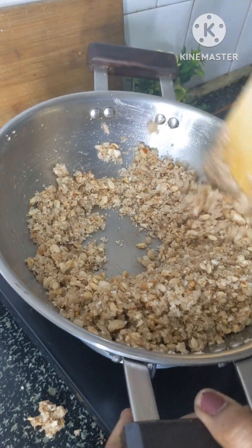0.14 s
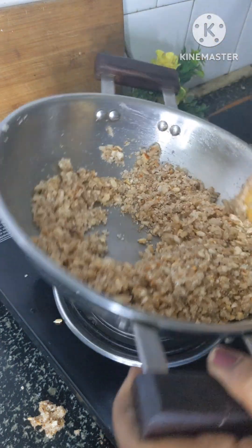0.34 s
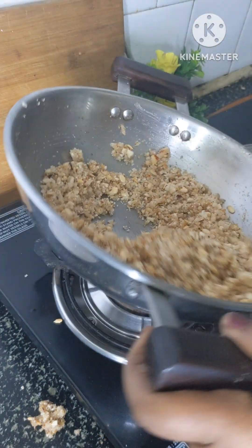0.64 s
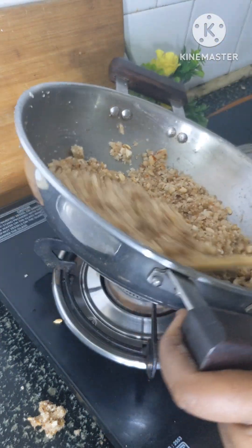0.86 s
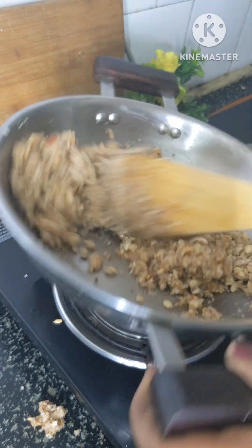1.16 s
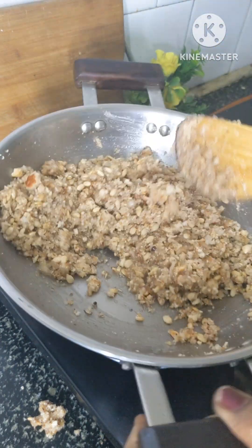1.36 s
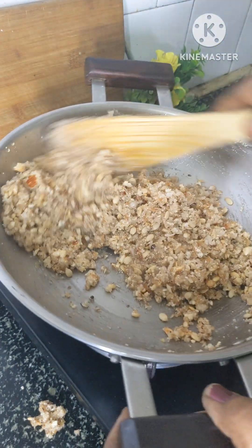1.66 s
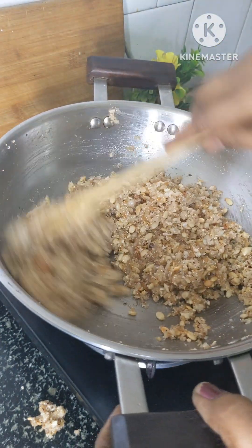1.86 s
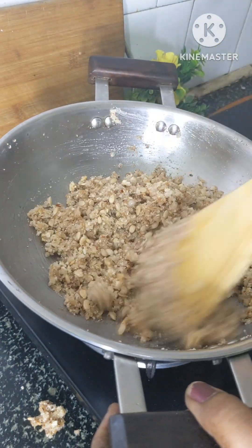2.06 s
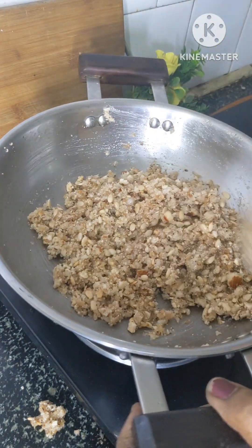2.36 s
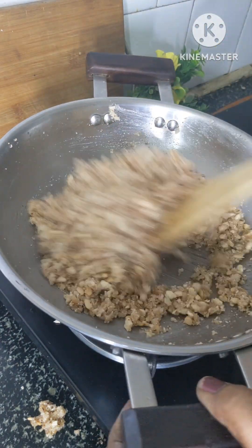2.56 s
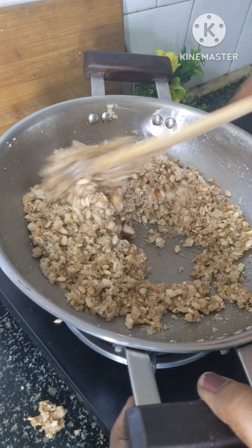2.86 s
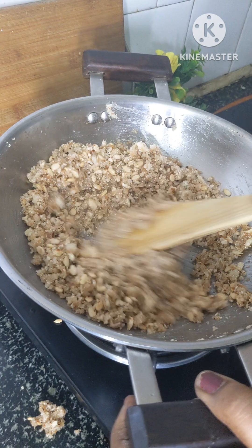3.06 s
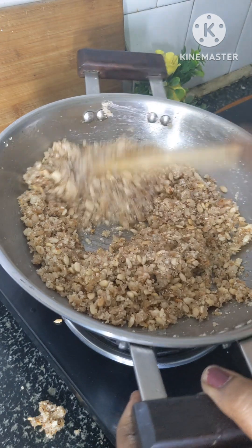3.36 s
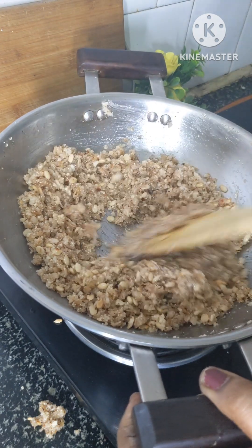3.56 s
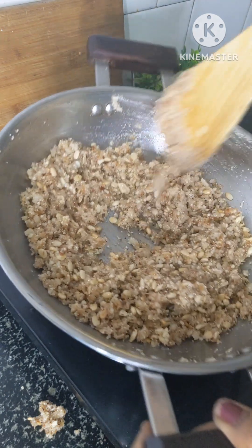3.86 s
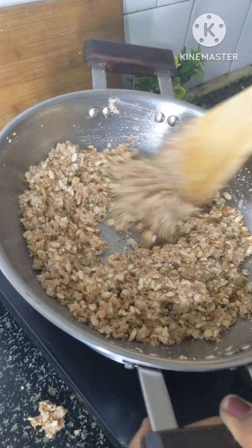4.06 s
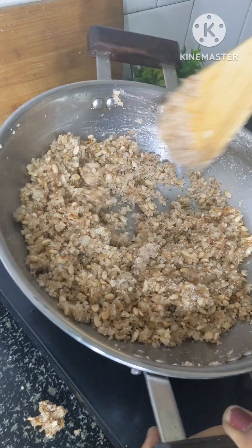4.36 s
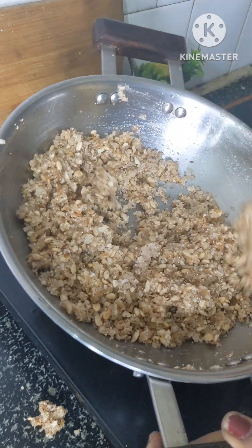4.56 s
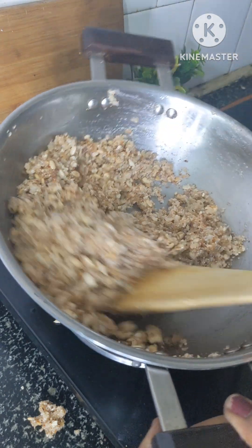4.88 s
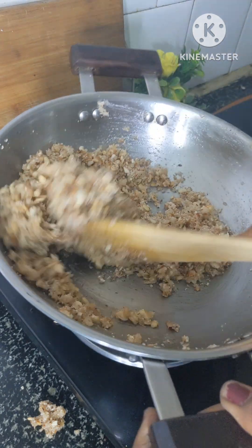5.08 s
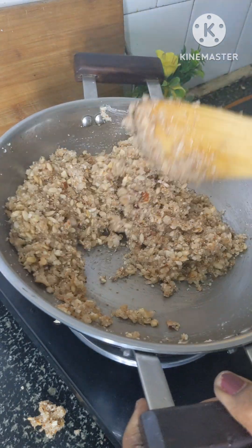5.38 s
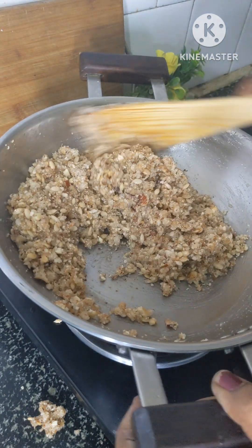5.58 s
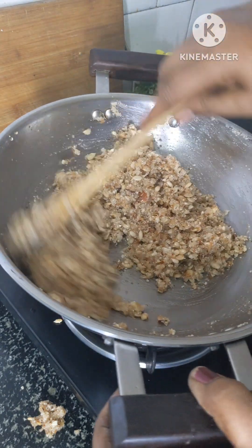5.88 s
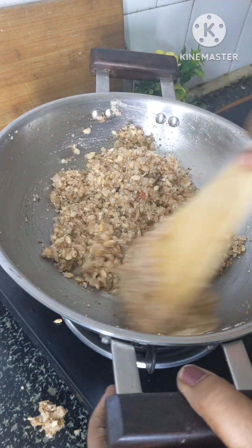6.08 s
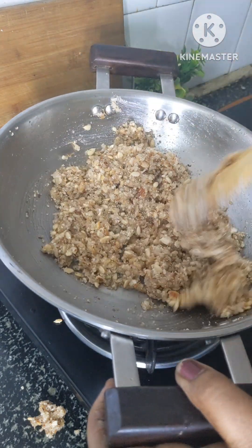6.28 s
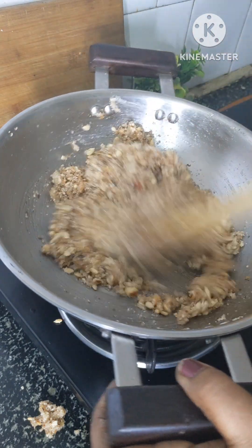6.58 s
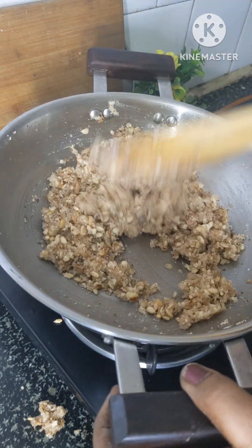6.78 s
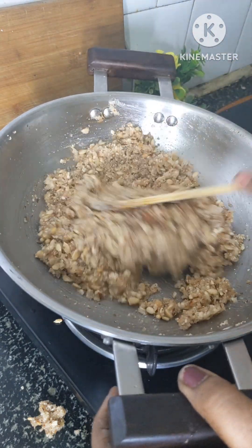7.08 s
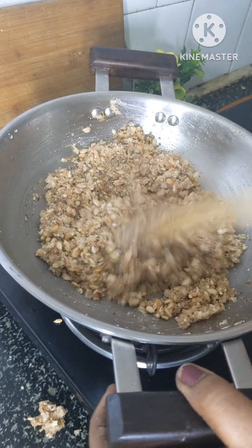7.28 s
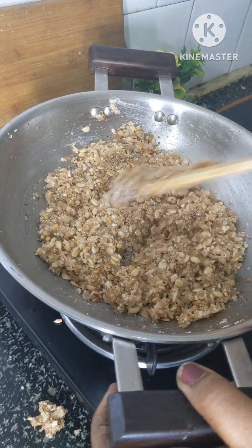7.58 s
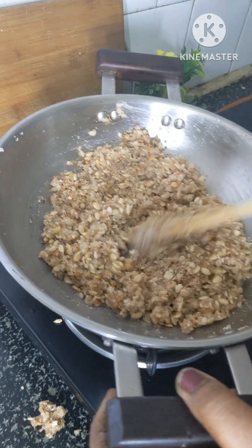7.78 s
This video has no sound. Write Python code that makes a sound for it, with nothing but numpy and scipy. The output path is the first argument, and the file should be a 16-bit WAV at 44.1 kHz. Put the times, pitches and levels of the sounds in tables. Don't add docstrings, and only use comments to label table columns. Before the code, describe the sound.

A wooden spatula knocks, scrapes and hisses through crumbly food in a steel pan, bangles clinking on the stirring wrist in a small tiled kitchen.

```python
import sys
import numpy as np
from scipy import signal
from scipy.fft import rfft, irfft, next_fast_len
from scipy.io import wavfile
from scipy.ndimage import uniform_filter1d, map_coordinates

SR = 44100
rng = np.random.default_rng(int(sys.argv[2]) if len(sys.argv) > 2 else 0)


def voltage_ratio(decibels):
    exponent = np.asarray(decibels, float) / 20
    return 10 ** exponent


def store_wav(level_fs):
    pcm = np.round(np.clip(np.atleast_2d(level_fs), -1, 1) * 32767)
    wavfile.write(sys.argv[1], SR, pcm.T.astype(np.int16))


N = 350154

# frequency in Hz, level in dB per Hz.
AIR_COLOUR = [(15, -36), (25, -10), (91, 7.5), (122, 8.5), (188, -13.5), (340, -2.5), (997, -5),
              (1800, -13), (6920, -22), (11200, -29), (15500, -32)]
# frequency in Hz, likeness from 0 to 1.
PORT_LIKENESS = [(30, 0.44), (70, 0.87), (300, 0.73), (700, 0.68), (1500, 0.22), (5000, 0.051)]
# frequency in Hz, left over right in dB.
PORT_BALANCE = [(60, -6.5), (110, -3), (200, -5.5), (380, -0.5), (700, -4.5), (1290, -3), (2380, -4),
                (4400, -4), (8120, -8.5), (15000, -12.5)]
# frequency in Hz, 60 dB decay in seconds.
KITCHEN_DECAY = [(100, 0.99), (260, 0.46), (700, 0.39), (1840, 0.38), (4850, 0.25), (12800, 0.28)]

# frequency in Hz, level in dB per Hz.
CRUMB_COLOUR = [(590, -8.5), (1000, -8.5), (1480, -10.5), (2360, -8.5), (2710, -9.5), (4190, -9),
                (4810, -9), (7700, -11), (15500, -20.5)]
# frequency in Hz, level in dB per Hz.
RUB_COLOUR = [(240, -21), (400, -13.5), (550, 1.5), (602, -7), (812, -1), (1140, -4.5), (3500, -10.5),
              (4550, -18.5), (7700, -120)]
# frequency in Hz, level in dB per Hz.
GRIND_COLOUR = [(100, -43), (170, -15), (226, -6.5), (258, -2.5), (461, -7.5), (900, -22), (1170, -60),
                (1980, -120)]
# fastest moment in seconds, speeding up in seconds, slowing down in seconds,
# crumb level in dB, wood on steel level in dB.
SWEEPS = [(0.40, 0.22, 0.15, -52, -61), (0.70, 0.26, .1, -54.5, -66), (0.82, 0.12, 0.37, -49.5, -60),
          (1.17, 0.33, 0.37, -55, -58), (1.68, 0.22, 0.21, -48, -51.5), (2.12, 0.47, 0.21, -46, -69),
          (2.62, 0.09, 0.2, -45, -50.5), (3.1, 0.087, 0.33, -45.5, -59), (3.25, 0.16, 0.18, -48, -51),
          (3.62, 0.17, 0.23, -44.5, -44.5), (0.01, .05, 0.14, -60.5, -48), (4.25, 0.11, 0.093, -39, -60),
          (4.665, 0.08, 0.31, -49.5, -67), (4.91, 0.19, 0.29, -46.5, -58), (6.36, 0.25, .045, -52, -59),
          (5.4, 0.092, 0.12, -55, -61), (5.699, 0.079, 0.54, -52, -70), (6.1, 0.34, 0.35, -45, -55.5),
          (6.68, 0.06, 0.2, -45, -67), (6.81, 0.16, 0.087, -43, -43), (7.16, .12, 0.089, -51, -48.5),
          (7.469, 0.056, 0.056, -43, -54), (7.6, 0.094, .05, -53, -80), (7.8, 0.033, 0.41, -50.5, -49.5)]
# start in seconds, crumb level in dB, 60 dB decay in seconds.
SCUFFS = [(0.046, -49, 0.62), (0.1, -52, 3.2), (0.822, -45.5, 0.43), (1.165, -50, 0.26), (2.42, -44, .3),
          (2.448, -38.5, 0.11), (2.84, -56, 0.22), (3.501, -45, 0.9), (4.54, -46, .15), (5.235, -57, .4),
          (7.175, -35.5, 0.38), (7.92, -51.5, 0.56), (3.88, -52.5, 0.5)]
# peak time in seconds, level in dB, swell length in seconds.
PAN_SHIFTS = [
    (0, -50.5, 0.12),
    (1.16, -46.5, 0.24),
    (1.84, -52.5, 0.1),
    (2.6, -54, 0.28),
    (3.72, -53.5, 0.24),
    (4.95, -57.5, 0.12),
    (6.37, -61, 0.087),
    (6.83, -47.5, 0.11),
    (7.14, -52, 0.13),
]
# time in seconds, first mode level in dB, second mode level in dB.
STOVE_JOLTS = [(0, -60, -63), (.435, -50, -40), (1.0, -56.5, -55), (1.12, -52, -46.5), (1.21, -49.5, -63),
               (1.462, -32, -50), (2.45, -49.5, -60), (2.6, -56, -59), (3.25, -65, -65), (3.6, -36, -55),
               (4.24, -59, -61), (4.55, -59, -65), (4.85, -49, -75), (5.295, -42, -43.5), (6.79, -53, -52),
               (6.96, -50, -72), (7.08, -54, -75), (7.22, -45.5, -56), (7.42, -52.5, -60.5),
               (7.8, -56, -66)]

# time in seconds, peak in dB, ring in dB, thin ring in dB, tick colour in Hz.
BANGLE_CLINKS = [(0.0471, -23.5, -14, -16, 9100), (0.0596, -25, -12, -20.5, 5500),
                 (0.8234, -36, -17, -17, 6820), (1.1616, -45, -4.5, -26, 3570),
                 (1.908, -40, -11.5, -11.5, 9150), (2.4168, -35.5, -12.5, -21.5, 9120),
                 (2.831, -44, -14, -29.5, 3700), (2.9883, -46, -12.5, -29.5, 10300),
                 (3.0877, -36, -6, -23, 7110), (3.506, -33.5, -4, -24.5, 6570), (3.79, -39, -10, -22, 3630),
                 (3.875, -35.5, -8.5, -24, 3600), (4.5405, -38, -11, -25, 8000),
                 (4.999, -48, -3, -22, 8050), (5.983, -43.5, -7, -17, 3680),
                 (6.382, -54.5, -5.5, -24.5, 10300), (6.6672, -41.5, -11.5, -18.5, 3680),
                 (6.764, -36, -11.5, -12, 9500), (6.799, -35, -7.5, -36, 6850),
                 (7.1736, -23.5, -9, -22, 4460), (7.419, -42, -16, -22, 6760),
                 (7.465, -38.5, -7.5, -24.5, 8800), (7.551, -44.5, -17, -17, 8860)]
# frequency in Hz, level in dB.
BANGLE_MODES = [(7450, -9), (8900, -9), (10950, -4), (11120, -2), (11290, -1), (11460, -2), (11640, -3)]
# frequency in Hz, level in dB.
THIN_BANGLE_MODES = [(14850, -1), (15300, -1.5), (15450, 3.5)]
# time in seconds, peak in dB, colour in Hz.
CRUMB_TICKS = [(2.8442, -41.5, 5300), (3.255, -37.5, 8900), (5.1791, -47, 4260), (4.481, -51, 2700),
               (5.2392, -34.5, 5400), (5.2613, -48, 2600), (7.608, -38.5, 6000), (5.655, -45.5, 5200),
               (7.0452, -51, 4380), (7.6155, -35, 6160), (5.477, -53, 9100), (5.08, -55, 9500),
               (5.222, -54, 3200), (3.608, -42, 4500), (3.0457, -49, 5110), (2.9654, -55, 9650),
               (3.197, -46, 10500), (2.141, -44, 7500), (2.103, -47, 7000), (5.798, -50, 11000)]
# frequency in Hz, level in dB per Hz.
TICK_COLOUR = [(1180, -42.5), (2000, -8.5), (7590, -4.5), (10200, -10.5), (11400, -9.5), (15500, -17),
               (16500, -49.5)]

# time in seconds, peak in dB, low wood note in Hz, treble in dB,
# low over high note in dB.
FOOD_THUDS = [(0.074, -40.5, 480, -10, 45), (2.331, -38, 690, -29, 8), (4.539, -30.5, 250, -11, 26),
              (5.2895, -24, 340, -40, 4), (3.873, -30.5, 516, -30, 18.5), (7.141, -32, 620, -32, 9),
              (3.668, -34.5, 560, -30, 11), (1.471, -15, 460, -16.5, -2), (5.311, -28, 1300, -25, 10),
              (1.579, -24, 620, -24, 6), (1.5, -33.5, 540, -25, 8), (6.8, -34, 1170, -23, 10)]
# time in seconds, peak in dB, low wood note in Hz, treble in dB,
# low over high note in dB.
FLAT_TAPS = [(0.4291, -16, 1090, -18.5, 1), (1.71, -31, 670, -35, 22), (1.732, -27, 920, -48, 15),
             (2.326, -41, 700, -18, -4), (3.496, -35.5, 920, -25, 23), (3.516, -30.5, 640, -26, 10.5),
             (3.604, -31.5, 790, -14.5, 5), (3.62, -27, 960, -25, 14), (4.209, -39, 800, -12, 11),
             (4.842, -29, 540, -36, 7.5), (5.294, -18, 830, -16.5, 12.5), (6.65, -47, 643, -20, 16.5),
             (6.786, -31.5, 1090, -27, 5), (6.92, -39, 756, -38, 20), (6.965, -34.5, 920, -59, 11),
             (7.061, -38, 1400, -13, -6), (7.102, -33.5, 755, -20, 15), (7.132, -30, 620, -23, 6),
             (7.22, -28, 800, -28, 11), (7.445, -35, 1310, -9.5, 16), (7.768, -42.5, 420, -10, -5)]
# time in seconds, peak in dB, low note
# in Hz, treble in dB, low over high note in dB.
EDGE_KNOCKS = [
    (0.44, -24.5, 935, -7.5, -1),
    (1.4564, -7, 337, -12.5, -9),
    (2.446, -26.5, 800, -28, 7.5),
    (3.085, -36.5, 942, -10.5, 8),
    (3.874, -32, 2080, -24.5, 9),
    (4.227, -25, 780, -15.5, -11.5),
    (4.242, -38, 447, -14, 13.5),
]
# frequency in Hz, level in dB per Hz.
CONTACT_COLOUR = [(88, -12.5), (150, -7.5), (189, -14), (453, -3), (631, -3.5), (1540, -6), (3830, -10),
                  (5760, -12), (13000, -23), (15500, -32)]
# frequency in Hz, level in dB, 60 dB decay in seconds.
PAN_MODES = [(245.4, -7, 0.41), (337, -1.5, 0.35), (396, -3, 0.57), (459.8, 2.5, 0.29), (570, -7, 0.4),
             (696, -5.5, 0.43), (776, -3.5, 0.4), (975, -2.5, 0.24), (1112, -0.5, 0.15), (1550, -4.5, 0.2),
             (1440, -11.5, .2), (1694, -9, 0.14), (2085, -14, 0.16), (2230, -12, 0.16), (2790, -11.5, 0.2)]
# frequency in Hz, width in Hz, level in dB.
WALL_RESONANCES = [(2180, 340, -11.5), (2690, 220, -14), (4640, 560, 0), (6230, 230, -4)]

# time in seconds, level of a 0 dB mode in dB.
WALL_BLOWS = [
    (1.457, -23.5),
    (0.4395, -29),
    (5.293, -29),
    (3.874, -36),
    (7.22, -33.5),
    (2.445, -38),
    (4.228, -37.5),
]
# frequency in Hz, level in dB, 60 dB decay in seconds.
RIM_MODES = [(1120, -2.5, .23), (1342, -2, .2), (1604, 1, .24), (1690, 0, .24), (2060, -1, .2),
             (2660, 9, .04), (2772, -5, .24), (3300, 0, .1), (4140, -5, .17), (4790, -5, .18),
             (800, 6, .04), (5925, -10, .13), (6650, -11, .13), (2230, 7, .035)]
SIDE_MODES = [(459, -7, 0.33), (597, 2, .1), (690, -10, 0.24), (968, -1, 0.31), (1110, -2, 0.29),
              (1200, -5, .15), (2226, -7, .23), (3040, -14, .25), (4590, -12, .15), (4850, -12, .25),
              (5030, -9, .25), (6500, -16, .2), (7700, -14, .1)]
FLOOR_MODES = [(283, -8, 0.27), (397, -3, 0.57), (780, 2, .3), (1018, -9, 0.35), (1430, -5, 0.26),
               (1530, -9, .15), (1940, -14, .25), (2260, -7, .2), (2740, -15, .21), (3340, -15, .2),
               (4870, -17, 0.2), (5650, -18, .2), (6712, -14, .24)]
LIP_MODES = [(2080, 3, 0.078), (2380, -10, .14), (513, -4, .15)]
FLAT_MODES = [(463, -3.5, .12), (640, -4, .05), (781, 1, 0.13), (1002, 3, 0.11), (1211, -7, 0.17)]
EDGE_MODES = [(770, -1, .2), (1120, -2, 0.16), (1502, -9, .2), (2169, -6, .15), (2600, 5, 0.036)]
SCRAPE_MODES = [(1430, -4, 0.37), (2660, -2, .08), (2730, 0, .2), (2930, 2, .12), (4120, -10, .15),
                (4700, -15, 0.48)]

# start in seconds, end in seconds, first pitch in Hz, last pitch in Hz, level in dB.
SQUEAKS = [
    (2.72, 2.98, 1460, 1460, -69),
    (2.851, 2.874, 1490, 1470, -52),
    (3.335, 3.53, 1075, 1055, -63),
    (3.32, 3.41, 2240, 2200, -68),
    (3.39, 3.54, 2020, 2070, -65),
    (4.225, 4.35, 1430, 1430, -57),
    (4.26, 4.35, 2800, 2760, -56),
    (3.789, 3.815, 3760, 3690, -56),
]

PORT_LAG_S = 5 / SR


def unit(x):
    return x / np.sqrt(np.mean(x ** 2) + 1e-20)


def along(points, hz):
    f, v = np.transpose(points)
    return np.interp(np.log(hz + 1), np.log(f + 1), v)


def wobble(rate):
    knots = rng.standard_normal(int(N * rate / SR) + 4)
    return map_coordinates(knots, [np.arange(N) * rate / SR])


def filtered(x, response):
    n = x.shape[-1]
    m = next_fast_len(n + 4096)
    return irfft(rfft(x, m) * response(np.fft.rfftfreq(m, 1 / SR)), m)[..., :n]


def evened(x, width_hz):
    z = rfft(x)
    lumps = uniform_filter1d(np.abs(z) ** 2, round(width_hz * len(x) / SR))
    return irfft(z / np.sqrt(lumps), len(x))


def resonance(f, hz, width_hz, db):
    return voltage_ratio(db) * 1j * f * width_hz / (hz * hz - f * f + 1j * f * width_hz)


def wall(f, lift_db):
    return 2 + sum(resonance(f, hz, width, db + lift_db) for hz, width, db in WALL_RESONANCES)


def add(out, s, x):
    start = round(s * SR)
    out[:, start:start + x.shape[1]] += x


def ports(pair, likeness):
    turn = lambda hz: np.arccos(np.clip(likeness(hz), 0, 1)) / 2
    mid, side = filtered(pair, lambda hz: np.array([np.cos(turn(hz)), np.sin(turn(hz))]))
    late = lambda hz: np.array([np.exp(-2j * np.pi * hz * PORT_LAG_S), 1 + 0 * hz])
    return filtered(np.array([mid + side, mid - side]), late)


def shaded(pair):
    shade_db = lambda hz: 3 * np.clip(np.log2(hz / 5000 + 1e-9) + 1, 0, 2.5)
    return filtered(pair, lambda hz: voltage_ratio(np.outer([-.5, .5], shade_db(hz))))


def in_kitchen(x, wet_db):
    hz, t, z = signal.stft(rng.standard_normal((2, len(x))), SR, nperseg=256)
    fade = voltage_ratio(-60 * t / along(KITCHEN_DECAY, hz)[:, None])
    tail = signal.istft(z * fade, SR, nperseg=256)[1][:, :len(x)]
    tail = tail * (1 - np.exp(-np.arange(len(x)) / SR / 0.00023))
    tail = ports(tail, lambda hz: 1.33 * along(PORT_LIKENESS, hz) ** 2)
    tail = np.array([evened(side, width_hz=70) for side in tail])
    wet = signal.fftconvolve(x[None], tail / np.linalg.norm(tail[0]), axes=1)[:, :len(x)]
    direct = ports(np.array([x, 0 * x]), lambda hz: 1 + 0 * hz)
    return direct + voltage_ratio(wet_db) * wet


def rush(spectrum, grit_db, grit_rate, patchy_db):
    grit = voltage_ratio(2 * grit_db * np.tanh(wobble(grit_rate) / 2))
    z = signal.stft(rng.standard_normal((2, N)) * grit, nperseg=256)[2]
    field = uniform_filter1d(rng.standard_normal(z.shape[1:]), size=3, axis=0)
    field = uniform_filter1d(field, size=8, axis=1)
    pair = signal.istft(z * voltage_ratio(patchy_db * unit(field)), nperseg=256)[1][:, :N]
    pair = filtered(pair, lambda hz: voltage_ratio(along(spectrum, hz)))
    pair = ports(pair, lambda hz: along(PORT_LIKENESS, hz))
    return unit(filtered(pair, lambda hz: voltage_ratio(np.outer([.5, -.5], along(PORT_BALANCE, hz)))))


def air():
    return voltage_ratio(-57.5) * rush(AIR_COLOUR, grit_db=1.8, grit_rate=8.8, patchy_db=0.5)


def grinding():
    t = np.arange(N) / SR
    steel = lambda f: 0.5 + sum(resonance(f, hz, 6.5, db + 4) for hz, db, _ in PAN_MODES)
    grind = unit(filtered(rush(GRIND_COLOUR, grit_db=4.5, grit_rate=63, patchy_db=2), steel))
    swells = sum(voltage_ratio(db - 19 * np.abs(t - s) / swell) for s, db, swell in PAN_SHIFTS)
    return (voltage_ratio(-61.5) + swells) * grind


def stove():
    out = np.zeros((2, N))
    times = np.array([[s] for s, *_ in STOVE_JOLTS])
    since = np.maximum(np.arange(N) / SR - times, 0)
    for mode, (hz, rise, t60) in enumerate([(87.5, 0.014, 0.89), (142, 0.0068, 0.51)]):
        level = voltage_ratio([[row[mode + 1] + 5] for row in STOVE_JOLTS])
        jolts = level * (1 - np.exp(-since / rise)) * voltage_ratio(-60 * since / t60)
        swing = np.linalg.norm(jolts, axis=0) * voltage_ratio(2.6 * wobble(15))
        cycles = hz * np.cumsum(1 + .025 * wobble(14)) / SR
        out += voltage_ratio([[-.9], [.9]]) * swing * np.sin(2 * np.pi * cycles)
    return out


def sweep(s, up_s, down_s):
    t = np.arange(N) / SR - s
    touch_db_per_s, lift_db_per_s = 1500, 500
    rising = 13.5 * t / up_s + touch_db_per_s * np.minimum(t + up_s, 0)
    falling = -17 * t / down_s - lift_db_per_s * np.maximum(t - down_s, 0)
    return voltage_ratio(np.where(t < 0, rising, falling))


def scuffs():
    t = np.arange(N) / SR
    return np.max([voltage_ratio(db - np.where(t < s, 1500 * (s - t), 60 * (t - s) / t60)) for s, db, t60 in SCUFFS], axis=0)


def stirring():
    strokes = [np.outer(voltage_ratio([crumb_db, rub_db]), sweep(s, up, down)) for s, up, down, crumb_db, rub_db in SWEEPS]
    hiss, press = np.max(strokes, axis=0)
    grip = voltage_ratio(.9 * wobble(30))
    crumbs = rush(CRUMB_COLOUR, grit_db=1.6, grit_rate=900, patchy_db=2.6)
    crumbs = unit(filtered(crumbs, lambda f: wall(f, lift_db=-18.5)))
    scuffed = filtered(crumbs[:, ::-1], lambda hz: 1 / (1 + (2200 / (hz + 1)) ** 4))
    rub = rush(RUB_COLOUR, grit_db=1.5, grit_rate=190, patchy_db=1.8)
    return grip * (hiss * crumbs + scuffs() * scuffed + press * rub)


def sing(modes, t):
    out = 0
    for hz, db in modes:
        pitch = hz * rng.normal(1, 0.011)
        out = out + voltage_ratio(db + rng.normal(0, 3.7)) * np.sin(2 * np.pi * pitch * t + rng.uniform(0, 3.2))
    return out


def clink(db, ring_db, thin_db, tick_hz, tick_t60):
    t = np.arange(round(.25 * SR)) / SR
    tick = evened(rng.standard_normal(len(t)) * voltage_ratio(-60 * t / tick_t60), width_hz=1040) * (t < t[-1] / 2)
    colour = lambda hz: voltage_ratio(along(TICK_COLOUR, hz)) * (1 + resonance(hz, tick_hz, 0.071 * tick_hz, 8.5))
    tick = filtered(tick, colour)
    ring = voltage_ratio(1.5 * ring_db + 1 - 60 * t / .035) * sing(BANGLE_MODES, t)
    thin = voltage_ratio(1.2 * thin_db + 4 - 60 * t / .06) * sing(THIN_BANGLE_MODES, t)
    pan_db = np.array([[-3.5], [3.5]])
    return voltage_ratio(db + 3.0 + pan_db) * in_kitchen(tick / np.abs(tick).max() + ring + thin, wet_db=-6.0)


def bangles():
    out = np.zeros((2, N + SR))
    for s, db, ring_db, thin_db, tick_hz in BANGLE_CLINKS:
        add(out, s, clink(db, ring_db, thin_db, tick_hz, tick_t60=0.024))
    return out[:, :N]


def crumb_ticks():
    out = np.zeros((2, N + SR))
    for s, db, tick_hz in CRUMB_TICKS:
        add(out, s, clink(db, -35, -35, tick_hz, tick_t60=0.012))
    return out[:, :N]


def blow(db, low_hz, treble_db, note_db, high_hz):
    t = np.arange(round(.6 * SR)) / SR
    hard = np.clip((db + 36) / 26, 0, 1)

    rattle = voltage_ratio(-60 * t / (0.023 + 0.079 * hard)) + 1.5 * voltage_ratio(-60 * t / .012)
    contact = rng.standard_normal(len(t)) * rattle * (1 - np.exp(-t / 0.00084))
    contact = evened(contact, width_hz=137) * (t < t[-1] / 2)

    def soft(hz):
        octaves = np.log2(hz / (1500 + 800 * hard ** 2) + 1e-9)
        return voltage_ratio((treble_db + 14.0) * np.clip(octaves / 1.55, 0, 1.3))

    def steel(hz):
        dip = 1 - .6 * resonance(hz, 3960, 220, 0)
        return voltage_ratio(along(CONTACT_COLOUR, hz)) * soft(hz) * wall(hz, lift_db=4.0) * dip

    def wood(hz):
        low = resonance(hz, low_hz, 0.15 * low_hz + 50, note_db - 2.0)
        return low + resonance(hz, high_hz, 0.17 * high_hz, -0.5 - note_db - 9 * hard)

    ring = 0
    for hz, level, t60 in PAN_MODES:
        fade = voltage_ratio(level + rng.normal(0, 1.6) - 60 * t / (t60 * (0.47 + 0.64 * hard)))
        ring = ring + fade * np.sin(2 * np.pi * hz * t + rng.uniform(0, 3.44))
    ring = filtered(ring * (1 - np.exp(-t / 0.0039)), soft)

    hit = filtered(contact, lambda hz: steel(hz) + wood(hz))
    hit = hit * (1 - np.exp(-t / (.0012 - .001 * hard)))
    hit = in_kitchen(hit / np.linalg.norm(hit), wet_db=-0.5 + 4.8 * hard)
    hit = hit / np.std(hit[:, :SR // 50]) + voltage_ratio(-13.0) * ring
    pan_db = -5 + 4.6 * hard ** 3
    return voltage_ratio(db - 9 + np.array([[.5], [-.5]]) * pan_db) * hit


def knocks():
    out = np.zeros((2, N + SR))
    for high_hz, rows in ((780, FOOD_THUDS), (1400, FLAT_TAPS), (2610, EDGE_KNOCKS)):
        for s, db, low_hz, treble_db, note_db in rows:
            add(out, s, blow(db, low_hz, treble_db, note_db, high_hz))
    return out[:, :N]


def wall_rings():
    out, t = np.zeros((2, N + SR)), np.arange(round(.45 * SR)) / SR
    spots = (RIM_MODES, SIDE_MODES, FLOOR_MODES, LIP_MODES, FLAT_MODES, EDGE_MODES, SCRAPE_MODES)
    for (s, db), modes in zip(WALL_BLOWS, spots):
        for hz, level, t60 in modes:
            flutter = voltage_ratio(2.6 * map_coordinates(rng.standard_normal(64), [t * 110]))
            lag = np.pi * hz * PORT_LAG_S + .3
            phase = rng.uniform(0, 2 * np.pi) + np.array([[-lag], [lag]])
            fade = voltage_ratio(db + level - 60 * t / t60 + np.array([[-1.5], [1.5]])) * (1 - np.exp(-t / .001))
            add(out, s, fade * flutter * np.sin(2 * np.pi * hz * t + phase))
    return out[:, :N]


def squeaks():
    out, t = np.zeros((2, N)), np.arange(N) / SR
    for start, end, first_hz, last_hz, db in SQUEAKS:
        hz = np.interp(t, [start, end], [first_hz, last_hz])
        swell = np.sin(np.pi * np.clip((t - start) / (end - start), 0, 1) ** .45) ** .5
        rough = np.clip((db + 64) / 8, .8, 2)
        tone = np.sin(2 * np.pi * np.cumsum(hz * (1 + 0.01065 * rough * wobble(90))) / SR)
        level_db = db + 3 + 2.5 * rough * wobble(70)
        out += voltage_ratio(level_db + np.array([[-2.2], [2.2]])) * swell * tone
    return out


def scene():
    pan = grinding() + stirring() + shaded(knocks()) + shaded(wall_rings())
    return air() + pan + stove() + bangles() + crumb_ticks() + squeaks()


def roll_off(x):
    return signal.sosfilt(signal.butter(12, 16830, fs=SR, output="sos"), x)


def record(dry):
    dry = filtered(dry, lambda hz: (1j * hz / (55 + 1j * hz)) ** 2)
    dry = dry / (1 + np.abs(dry / .9) ** 4) ** (1 / 4)
    top = filtered(dry, lambda hz: hz > 15560)
    kept = filtered(top, lambda hz: voltage_ratio(-9) * (hz < 16500))
    power = lambda size: np.abs(uniform_filter1d(np.sum(top ** 2, 0), size=size))
    sharp = power(128) > 5 * power(4096)
    attack = uniform_filter1d(1. * sharp, size=384) > 0
    gate = uniform_filter1d(1. * attack, size=128)
    return roll_off(dry - top + kept * gate)


dry = scene()
out = record(dry)
store_wav(out)
```